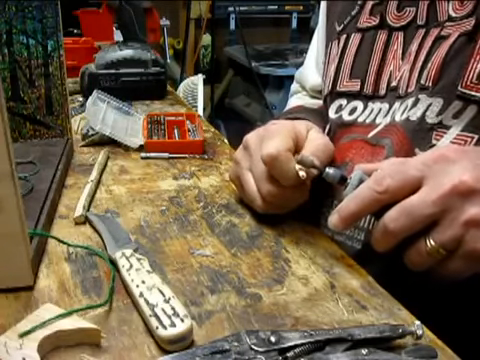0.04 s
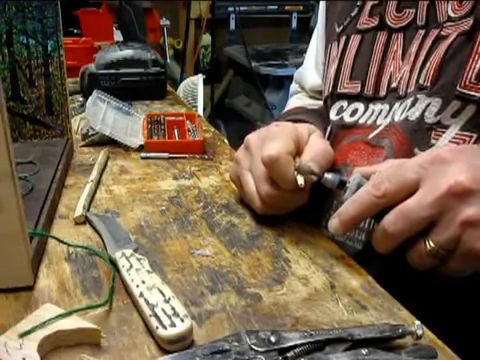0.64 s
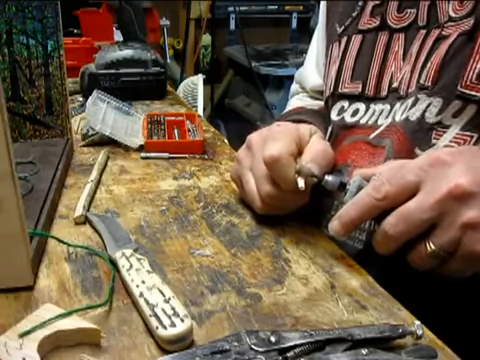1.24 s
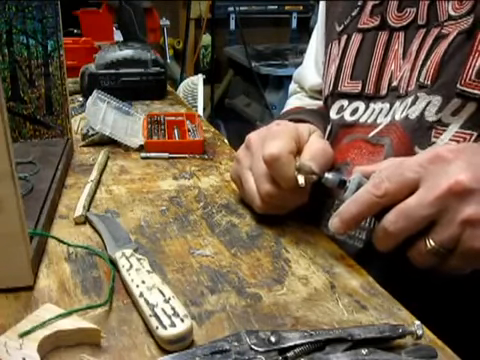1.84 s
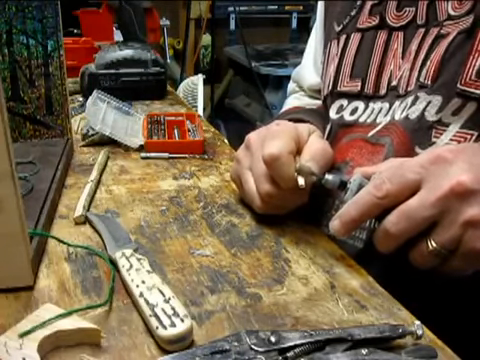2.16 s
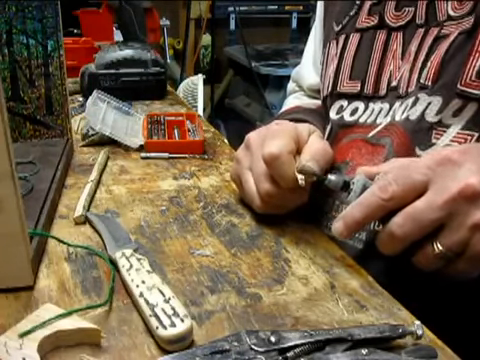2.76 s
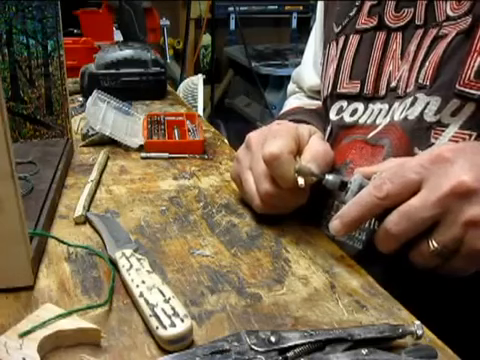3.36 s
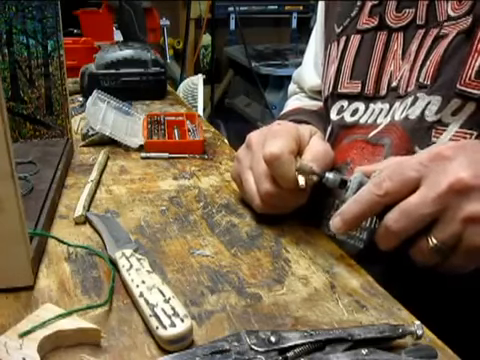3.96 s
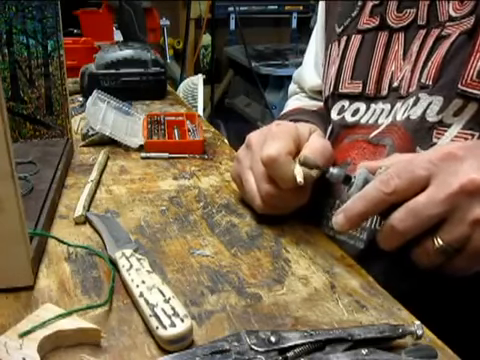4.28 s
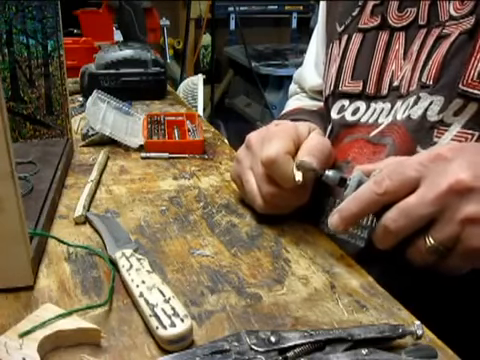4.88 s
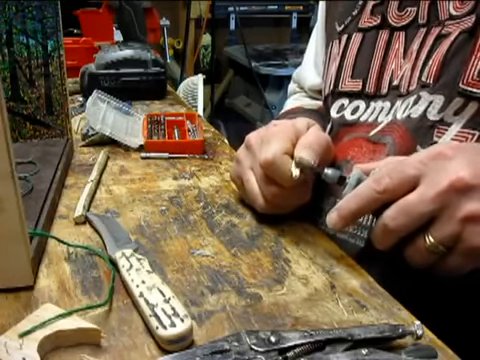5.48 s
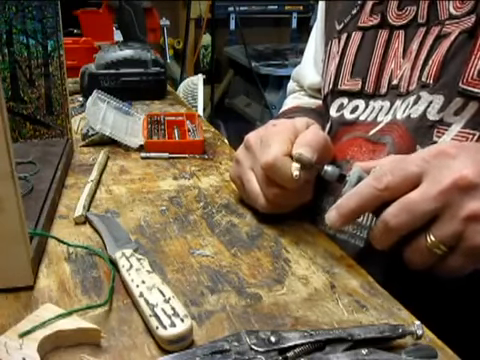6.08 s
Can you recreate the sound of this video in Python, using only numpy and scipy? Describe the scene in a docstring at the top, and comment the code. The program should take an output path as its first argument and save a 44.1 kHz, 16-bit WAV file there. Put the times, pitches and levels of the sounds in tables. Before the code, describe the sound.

A handheld rotary tool whines and buzzes close by, grinding a small piece of wood, its pitch sagging under pressure.

```python
"""At a workbench, close to a mono camera microphone: a mains-powered rotary tool grinds a small
piece of wood held in the hand. It runs free for a moment, then the bit bites and the shaft slows
whenever it is pressed harder. Every sound of the motor throbs with the mains. The camera samples
slowly, so the commutator's whistle folds down to a whine that climbs as the motor slows."""
import sys
import numpy as np
from scipy import signal
from scipy.fft import rfft, irfft, next_fast_len
from scipy.io import wavfile
from scipy.ndimage import map_coordinates

SR = 44100
rng = np.random.default_rng(int(sys.argv[2]) if len(sys.argv) > 2 else 0)


def pcm_store(signal):
    """Save signal as 16-bit PCM."""
    levels = np.round(np.clip(np.atleast_2d(signal), -1, 1) * 32767)
    wavfile.write(sys.argv[1], SR, levels.astype(np.int16).T)


N = 269436
TIME = np.arange(N) / SR
THROB_HZ = 119.95  # two peaks of current per mains cycle
FREE_HZ, INERTIA_S = 477.9, 0.464  # the shaft's free speed and the time it takes to follow the load


# Beats in the cut. Each row: shaft order, mains sideband, relative level in dB.
GROWL_BEATS = [(1, 1, -7.5), (1, 2, 0), (1, 3, -3.5), (1, 4, -1), (1, 5, -7), (2, -2, -6.5), (2, -1, -7.5),
               (2, 1, -3.5), (2, 4, -15.5)]

def growl(shaft, mains, contact, force, grind_db):
    """Nearest the microphone, surges of torque beat against the bit's strokes, which slip a little."""
    slip = shaft + 0.14 * contact * wobble(10)
    strokes = 0
    for order, side, db in GROWL_BEATS:
        phase = order * slip + side * mains + 1.12 * wobble(3) + rng.uniform(-np.pi, np.pi)
        strokes += amp(db) * np.cos(phase)
    roughness = 1 + 0.33 * contact * wobble(90)
    return amp(grind_db - 11 + 3.6 * contact + 0.68 * force) * unit(strokes * roughness)


# Resonances of the wood and tool in the hands. Each row: pitch in Hz, width in Hz, relative gain in dB.
WOOD_MODES = [(723, 103, -7.5), (848, 49, 1.5), (1029, 76, 2), (1162, 44, -10)]

def wood_ring(shaft, mains, force, airborne, grind_db):
    """The scraping bit rings the workpiece through resonances with steep skirts."""
    def response(hz):
        return sum(amp(db) * (2j * hz * width / (pitch ** 2 - hz ** 2 + 2j * hz * width)) ** 2
                   for pitch, width, db in WOOD_MODES)

    grains = scrape(shaft, mains, throb_db=1.5, turn_db=4, grit_db=2.5)
    return amp(grind_db - 6.5 - 0.47 * force - 1.4 * airborne) * unit(filtered(grains, response))


# The grit's spectrum. Each row: frequency in Hz, relative level in dB.
RASP_SPECTRUM = [(300, -49), (520, -9.5), (800, -1), (1200, -4), (1800, -1), (2400, -2.5), (3000, -9),
                 (4000, -10.5), (6000, -39)]
# Rough patches in the wood. Each row: centre and half-width in seconds, boost in dB.
ROUGH_PATCHES = [(1.44, 0.044, 3), (5.1, 0.042, 3.5), (5.79, 0.035, 6)]

def rasp(shaft, mains, force, airborne, treble_db):
    """The grit rasps over the wood, following part of each swing in the treble."""
    level_db = -39 + force - 2.9 * airborne + swells(ROUGH_PATCHES)
    level_db += 0.6 * (treble_db - treble_db.mean())
    grains = scrape(shaft, mains, throb_db=-1, turn_db=0.5, grit_db=3)
    return amp(level_db) * unit(coloured(grains, RASP_SPECTRUM))


# The unbalance hum. Each row: time in seconds, relative level in dB.
HUM_LEVELS = [(0.0, -42), (0.68, -49), (0.76, -59), (0.83, -49), (1.16, -56.5), (1.26, -50.5), (1.56, -57),
              (1.75, -48), (2.28, -51), (2.45, -66), (2.87, -48.5), (3.37, -55.5), (3.47, -47.5),
              (4.02, -55.5), (4.58, -47), (5.04, -55), (5.07, -51.5), (6.11, -47.5)]
# Four bands in relative dB: one mains sideband below a shaft order, on it, one above, two above.
HUM_BANDS_DB, HOWL_BANDS_DB = (-9.5, 0.5, -9, -15), (-13.5, 0.5, -6.5, -13.5)

def motor(shaft, mains, contact, speed, howl_db):
    """The unbalanced shaft hums, howls an octave higher and shakes the housing."""
    flutter = 0.05 + 0.25 * contact ** 2
    chattering = shaft + 0.055 * contact ** 3 * wobble(45)  # smears the high orders most
    hum_db, = curves(HUM_LEVELS, TIME)
    hum = partials(shaft, mains, HUM_BANDS_DB, drift_db=1.16, flutter=0.5 * flutter, scatter=0.94)
    howl_gain = amp(howl_db + 0.47) * (1 + 0.22 * contact * wobble(70))
    howl = partials(2 * chattering, mains, HOWL_BANDS_DB,
                    drift_db=1, flutter=0.18 * flutter, scatter=0.58)
    shake = housing(chattering, mains, contact, speed, flutter)
    return amp(hum_db - 1.16) * hum + howl_gain * howl + shake


# The free knock, the loaded buzz and the higher whir. Each row: shaft order, then relative levels
# in dB one mains sideband below, on the order, one above and two above.
KNOCK_ORDERS = [(3, -54, -40, -60, -46.5), (4, -47, -47, -42.5, -46.5), (5, -45.5, -48, -50.5, -56.5),
                (6, -49, -46.5, -41, -52), (7, -43, -50.5, -48.5, -52), (8, -44, -46.5, -48.5, -54.5),
                (9, -56.5, -45, -47.5, -50.5), (10, -47, -56.5, -58.5, -57), (11, -53, -50, -54.5, -66)]
BUZZ_ORDERS = [(3, -52.5, -46.5, -50.5, -53), (4, -48, -52.5, -52.5, -52), (5, -50, -49.5, -52.5, -58.5)]
WHIR_ORDERS = [(6, -59.5, -48.5, -48.5, -46.5), (7, -54, -49, -49, -54.5), (8, -51.5, -50, -49, -55),
               (9, -57.5, -52, -51, -51.5), (10, -62, -51.5, -57, -58)]
# The housing's response. Each row: speed in turns per second, buzz gain in dB, whir gain in dB.
HOUSING_GAINS = [(430, 0, -4), (430, -2.5, -0.5), (461, -3.5, 0), (457.2, 0, 1), (468, 1.5, -1),
                 (473, -3.5, -1)]

def housing(shaft, mains, contact, speed, flutter):
    """The tool knocks once a turn when free, and buzzes and whirs once the bit chatters on the wood."""
    def orders(table, drift_db, scatter):
        return sum(partials(order * shaft, mains, bands, drift_db, flutter, scatter)
                   for order, *bands in table)

    buzz_db, whir_db = curves(HOUSING_GAINS, speed)
    knock = amp(0.5) * orders(KNOCK_ORDERS, drift_db=1.1, scatter=0.48)
    buzz = amp(buzz_db) * orders(BUZZ_ORDERS, drift_db=2.5, scatter=1)
    whir = amp(whir_db) * orders(WHIR_ORDERS, drift_db=1.5, scatter=1)
    # the free knock gives way to buzz and whir as the bit meets the wood
    biting = np.interp(TIME, [0.37, 0.47], [0, 1])
    hand_damping = amp(4.7 - 6.5 * contact)
    return (1 - biting) * knock + biting * hand_damping * (buzz + whir)


# Resonances the whistle slides through. Each row: speed in turns per second, base level in dB.
WHISTLE_LEVELS = [(428, -40), (440, -40.5), (450, -41), (455, -36), (457, -38), (459, -40.5),
                  (462.5, -42.5), (468, -37.5), (475, -39), (478, -43.5)]
# Brief dips in the whistle. Each row: centre and half-width in seconds, change in dB.
WHISTLE_DIPS = [(0.8, 0.022, -12), (0.96, 0.025, -6), (1.39, 0.07, -2), (1.77, 0.025, -3), (2.0, 0.04, -3),
                (2.53, 0.07, -1), (2.8, 0.06, -5), (3.17, 0.025, -7), (4.14, 0.09, -7), (5.14, 0.05, -5),
                (5.37, 0.029, -7)]

def commutator(shaft, mains, contact, speed, bars=18):
    """The bars pass under the brushes in a thin whistle, louder at each peak of the current."""
    base_db, = curves(WHISTLE_LEVELS, speed)
    current = 1 + 0.077 * np.cos(mains) + 0.25 * np.cos(2 * mains)
    waver = 0.36 * contact ** 2 * wobble(40)
    level_db = base_db + swells(WHISTLE_DIPS) + 2 * contact * wobble(20)
    return amp(level_db) * unit(current * np.cos(bars * shaft + waver))


# The brushes' spectrum. Each row: frequency in Hz, relative level in dB.
BRUSH_SPECTRUM = [(1000, -43.5), (2000, -1.5), (2600, -11), (2780, -3.5), (3100, 2.5), (3500, -0.5),
                  (3800, 2), (4080, -5.5), (4400, -1), (4750, -8), (5000, -3.5), (5500, -6), (6500, -22.5),
                  (9000, -56)]

def brushes(shaft, mains, airborne, treble_db, sparks_per_s=200):
    """The brushes hiss and spark; the sparks crowd at the peaks of the current."""
    grains = scrape(shaft, mains, throb_db=-1.5, turn_db=-0.5, grit_db=-0.5)
    hiss = amp(treble_db - 0.1 - 6.2 * airborne) * unit(coloured(grains, BRUSH_SPECTRUM))
    strikes = rng.random(N) < sparks_per_s / SR * (1 + np.cos(mains))
    sparks = unit(coloured(strikes * rng.uniform(-1.02, 1, N), BRUSH_SPECTRUM))
    return hiss + amp(treble_db - 7.5 - 2.5 * airborne) * sparks


# The rise and fall of the hiss. Each row: time in seconds, base level in dB.
TREBLE_LEVELS = [(0.03, -29), (0.08, -33.5), (0.36, -31.5), (0.39, -37), (0.88, -36.5), (1.22, -36.5),
                 (1.47, -33.5), (1.62, -33.5), (1.88, -36.5), (2.0, -34.3), (2.43, -36.5), (2.56, -33),
                 (3.05, -36.5), (3.17, -33), (3.29, -37), (3.6, -34), (3.97, -34), (4.05, -38.5),
                 (4.14, -33), (4.95, -36.5), (5.1, -33.3), (5.28, -36), (5.78, -33.5), (5.88, -37.5),
                 (6.0, -33)]

def treble_level(contact):
    """The treble's level in dB flickers as the bit rides over the grain."""
    base_db, = curves(TREBLE_LEVELS, TIME)
    return base_db + 0.76 * contact * wobble(13) + 0.5 * contact * wobble(60)


# The bit is pressed to the wood. Each row: start and release in seconds, peak load as the turns
# per second it would cost, grinding change in dB, howl change in dB.
BIT_PRESSES = [(0.41, 1.345, 74.7, 0.6, -0.15), (1.751, 2.562, 52, 0.5, 1), (2.995, 3.364, 34.6, -0.5, 1.5),
               (3.744, 4.071, 28.6, 0.5, 2), (4.601, 5.252, 30.2, -0.5, -0.5),
               (5.447, 5.714, 24.2, 0, -0.5), (5.812, 5.939, 32, 1.5, -1)]
# It catches in the grain. Each row: centre and half-width in seconds, grinding and howl changes in dB.
BIT_CATCHES = [(0.88, 0.12, 2, 3.5), (1.086, 0.07, 2.5, 1), (1.285, 0.067, -1.5, 5),
               (1.43, 0.078, 6.5, 2.5), (1.885, 0.054, 7, 2), (2.09, 0.038, 6, 2), (2.23, 0.062, 4, 1.5),
               (2.597, 0.12, 3, 1.5), (3.114, 0.041, 4.5, 0.5), (4.741, 0.032, 4, 3.5), (4.985, 0.04, 4, 2),
               (5.205, 0.035, 3, 6.5), (5.914, 0.025, 3.5, 2), (6.03, 0.094, -0.5, 4)]
# It skates and the howl drops out. Each row: centre and half-width in seconds, howl change in dB.
BIT_SKATES = [(0.435, 0.042, -2.5), (1.61, 0.096, -4), (1.875, 0.019, -6.5), (2.79, 0.12, -3.5),
              (4.87, 0.034, -5), (5.535, 0.027, -5), (5.83, 0.044, 0)]

def hands(land_s=0.04, ease_s=0.108, settle_s=0.2, brushing_load=4, firm_load=47):
    """Each press lands, builds and eases off; in between, the bit still brushes the wood."""
    since_touch = TIME - BIT_PRESSES[0][0]
    landed = np.clip(since_touch / land_s, 0, 1)
    load = brushing_load * landed
    grind_db = -36.5
    howl_db = -39 + 3 * (1 - landed)  # stronger while the bit spins in the air
    for start, release, peak_load, press_grind_db, press_howl_db in BIT_PRESSES:
        corners = [start, start + land_s, release, release + ease_s]
        load += peak_load * np.interp(TIME, corners, [0, 0.25, 1, 0])
        held = np.interp(TIME, corners, [0, 1, 1, 0])
        grind_db += press_grind_db * held
        howl_db += press_howl_db * held
    force = load / firm_load
    settled = np.clip(since_touch / settle_s, 0, 1)
    contact = np.clip(settled * (0.64 + 0.36 * force), 0, 1)
    catch_grind_db = swells([(s, width, db) for s, width, db, _ in BIT_CATCHES], steepness=3)
    catch_howl_db = swells([(s, width, db) for s, width, _, db in BIT_CATCHES], steepness=2.7)
    skate_db = swells(BIT_SKATES, steepness=6.1)
    grind_db += 2.8 * force + catch_grind_db + 0.19 * skate_db + 0.5 * wobble(14)
    howl_db += 2.5 * force + catch_howl_db + skate_db + 0.5 * contact * wobble(22)
    return load, force, contact, grind_db, howl_db


# Spectra of the room, the cut's shudder and the bench. Each row: frequency in Hz, relative level in dB.
ROOM_SPECTRUM = [(15, 11.5), (30, -2), (60, -4.5), (150, -1.5), (280, -1.5), (500, 2.5), (2000, -33.5),
                 (6000, -48.5)]
SHUDDER_SPECTRUM = [(30, -12.5), (70, -6), (130, -4), (250, -6), (450, -10.5), (900, -36.5)]
BENCH_SPECTRUM = [(15, -13), (35, 3.5), (55, 8), (90, -9), (200, -24.5)]
# Arms against the bench. Each row: centre in seconds, level in dB, half-width in seconds.
ARM_BUMPS = [(5.568, -54.5, 0.068), (5.674, -62.5, 0.052), (5.898, -53, 0.057)]

def workshop(grind_db):
    """Under the tool the bench shudders and takes a few soft bumps; farther off, the room rumbles."""
    room = amp(-51.5 + 2.4 * wobble(5.3)) * noise(ROOM_SPECTRUM)
    shudder = amp(grind_db - 31.5 + 2 * wobble(11)) * noise(SHUDDER_SPECTRUM)
    bumps = sum(amp(db) * np.exp(-((TIME - s) / width) ** 2) for s, db, width in ARM_BUMPS)
    return room + shudder + bumps * noise(BENCH_SPECTRUM)


def scrape(shaft, mains, throb_db, turn_db, grit_db):
    """Noise in grains, pulsing with the mains and with the shaft."""
    white = rng.standard_normal(N)
    return white * amp(throb_db * np.cos(mains) + turn_db * np.cos(shaft) + grit_db * wobble(1500))


def partials(angle, mains, bands_db, drift_db, flutter, scatter):
    """A shaft order and its mains sidebands drift as the hands move; low scatter gives sharp pulses."""
    tone = np.zeros(N)
    for side, db in enumerate(bands_db, start=-1):
        phase = angle + side * mains + scatter * rng.uniform(-np.pi, np.pi)
        gain = amp(db + drift_db * wobble(3.83))
        tone += gain * (np.cos(phase) + flutter * wobble(55) * np.sin(phase))
    return np.sqrt(2) * tone


def amp(db):
    """Decibels to gain."""
    return 10 ** (np.asarray(db) / 20)


def unit(x):
    """x at rms 1."""
    return x / np.sqrt(np.mean(x ** 2) + 1e-20)


def curves(rows, at):
    """Each later column, interpolated along the first."""
    axis, *columns = np.transpose(rows)
    return [np.interp(at, axis, column) for column in columns]


def swells(rows, steepness=2):
    """A sum of swells in dB: bell-shaped, or flat-topped when steeper."""
    return sum(db * np.exp(-np.abs((TIME - s) / width) ** steepness) for s, width, db in rows)


def wobble(rate):
    """A smooth random curve, rate knots a second."""
    knots = rng.standard_normal(int(N * rate / SR) + 4)
    coarse = np.arange(0, N + 32, 32)
    return np.interp(np.arange(N), coarse, map_coordinates(knots, [coarse * rate / SR]))


def filtered(x, response):
    """x through a complex response of frequency."""
    size = next_fast_len(N + SR // 2)
    return irfft(rfft(x, size) * response(np.fft.rfftfreq(size, 1 / SR)), size)[..., :N]


def coloured(x, spectrum):
    """x through a spectrum of (Hz, dB) points on a log axis."""
    points_hz, db = np.transpose(spectrum)
    return filtered(x, lambda hz: amp(np.interp(np.log(hz + 1), np.log(points_hz), db)))


def noise(spectrum):
    """Coloured noise at rms 1."""
    return unit(coloured(rng.standard_normal(N), spectrum))


def scene():
    """The load slows the shaft; shaft angle, mains phase and contact drive every part of the tool."""
    load, force, contact, grind_db, howl_db = hands()
    airborne = np.clip(1 - 2 * contact, 0, 1)  # running free, tones carry most of the sound
    step = 1 / (INERTIA_S * SR)
    speed = FREE_HZ - signal.lfilter([step], [1, step - 1], load)
    shaft = 2 * np.pi * np.cumsum(speed) / SR
    mains = 2 * np.pi * THROB_HZ * TIME
    tool = motor(shaft, mains, contact, speed, howl_db) + commutator(shaft, mains, contact, speed)
    treble_db = treble_level(contact)
    tool += growl(shaft, mains, contact, force, grind_db)
    tool += wood_ring(shaft, mains, force, airborne, grind_db)
    tool += rasp(shaft, mains, force, airborne, treble_db)
    tool += brushes(shaft, mains, airborne, treble_db)
    return np.tile(tool + workshop(grind_db), (2, 1))


# The camera's playback filter. Each row: frequency in Hz, gain in dB.
CAMERA_RESPONSE = [(4300, 0), (5000, 1.5), (5500, -4), (6000, -5.5), (6500, -13.5), (7000, -23),
                   (7500, -36.5)]
SAMPLE_STRIDE, TOP_HZ = 4, 7600

def record(dry):
    """The camera keeps every fourth sample from its microphone: treble folds down, images leak out."""
    sampled = SAMPLE_STRIDE * dry * (np.arange(N) % SAMPLE_STRIDE == 0)
    return filtered(coloured(sampled, CAMERA_RESPONSE), lambda hz: hz < TOP_HZ)


dry = scene()
out = record(dry)
pcm_store(out)
```